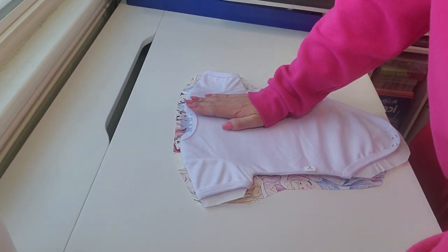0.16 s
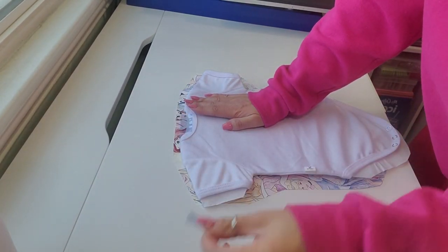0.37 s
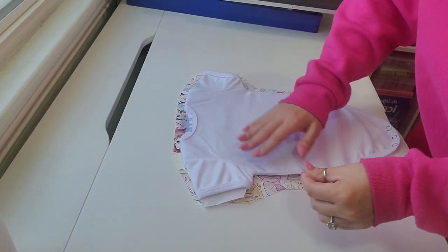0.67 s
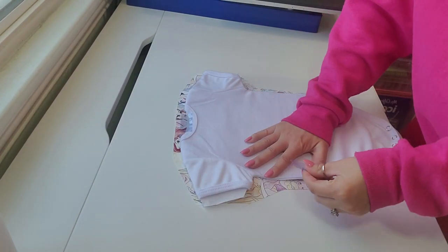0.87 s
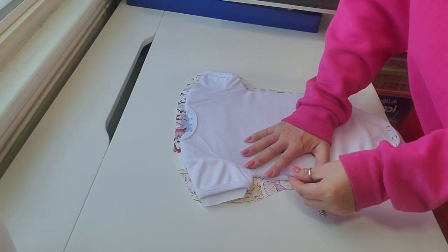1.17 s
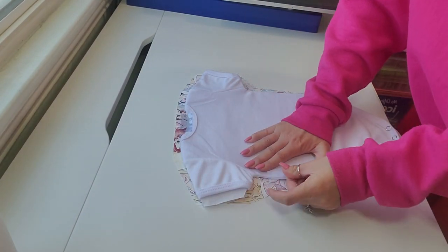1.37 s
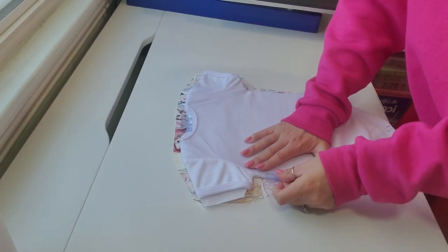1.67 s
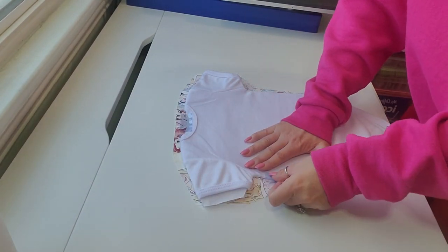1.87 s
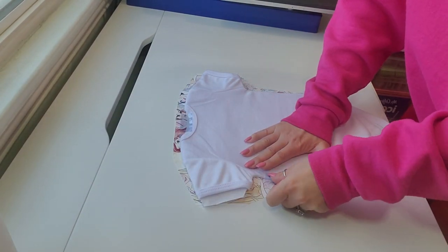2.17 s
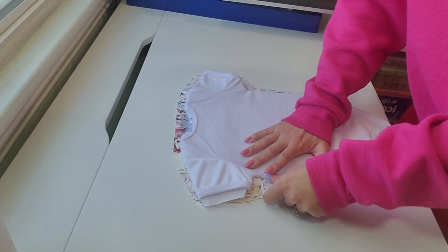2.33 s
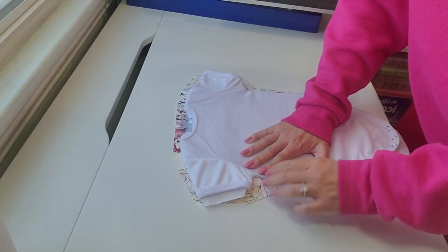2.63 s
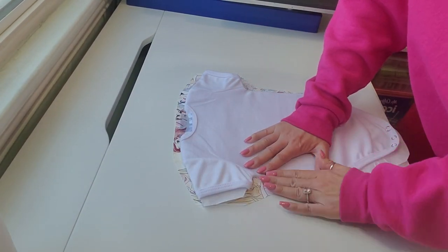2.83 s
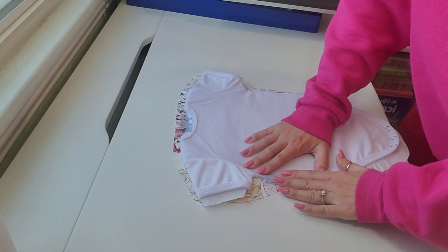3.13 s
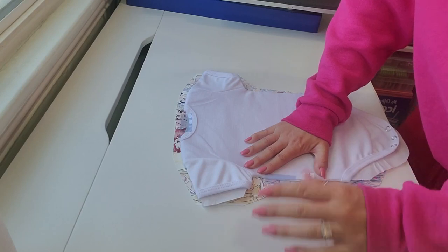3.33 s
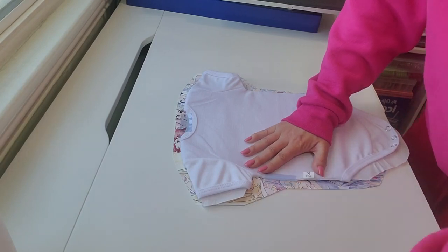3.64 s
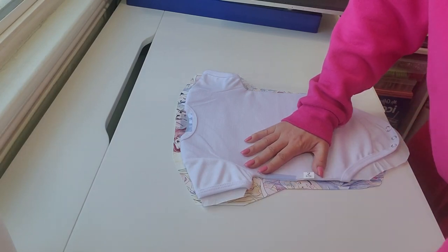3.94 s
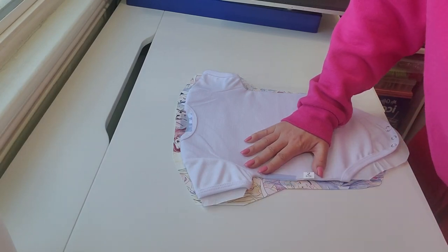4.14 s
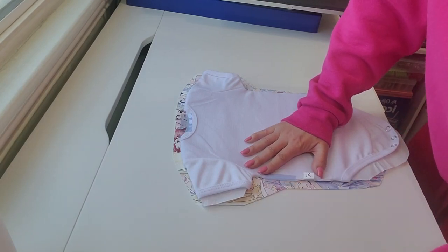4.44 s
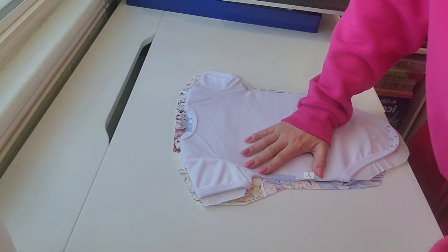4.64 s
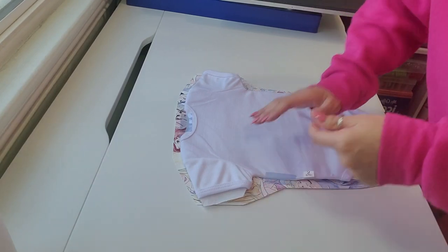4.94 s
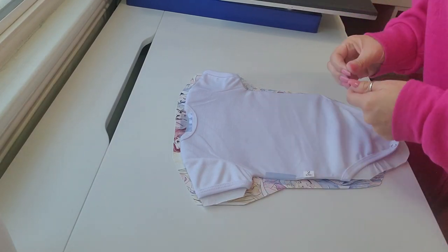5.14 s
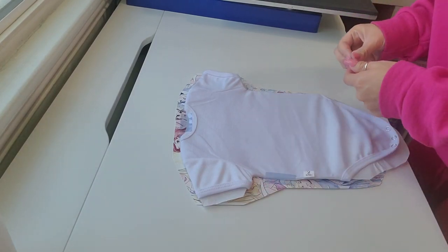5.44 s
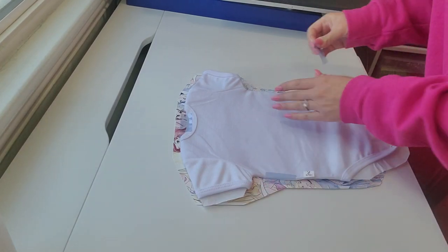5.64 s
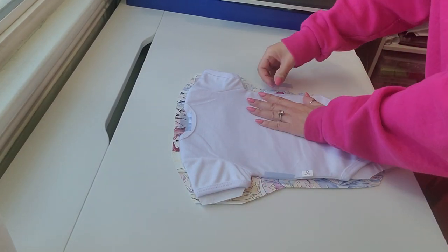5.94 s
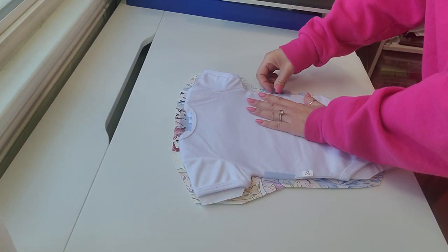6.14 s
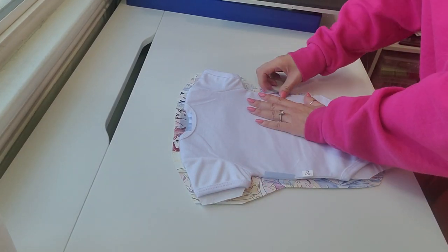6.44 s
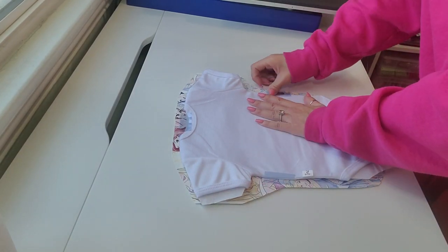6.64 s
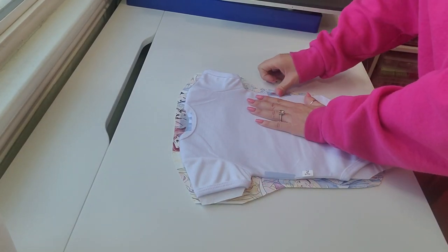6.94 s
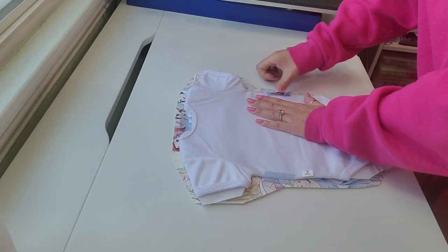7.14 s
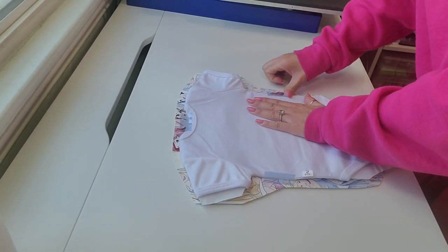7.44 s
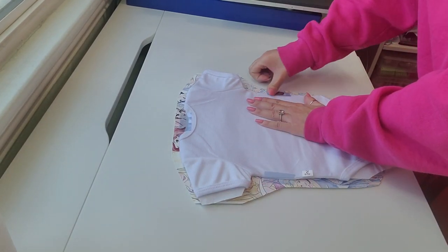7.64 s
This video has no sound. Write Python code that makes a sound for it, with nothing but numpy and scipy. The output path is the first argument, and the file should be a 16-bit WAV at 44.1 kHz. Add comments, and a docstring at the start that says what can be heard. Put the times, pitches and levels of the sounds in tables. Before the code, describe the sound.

Paper and tape crackle and click as hands smooth cloth on a table, with soft thuds and a low ventilation hum.

```python
"""Taping a small garment onto paper

Close to a phone, fingers rub and press cloth, and hands land on the table with soft thuds.
Paper and tape click and crackle in short rips, each with a hollow ring. Tape rasps off its roll
and is torn on the blade. A ventilation hum and a thin whine fill the quiet room."""
import sys
import numpy as np
from scipy import signal
from scipy.fft import rfft, irfft, next_fast_len
from scipy.io import wavfile
from scipy.ndimage import uniform_filter1d

SR = 44100
rng = np.random.default_rng(int(sys.argv[2]) if len(sys.argv) > 2 else 0)


def master(y):
    """Save y as 16-bit WAV."""
    cut = np.clip(np.atleast_2d(y).T, -1, 1)
    pcm = np.round(cut * 32767)  # scale
    wavfile.write(sys.argv[1], SR, pcm.astype(np.int16))


N = 344024


def gain(db):
    """Turn decibels into a number to multiply by."""
    return 10 ** (np.asarray(db) / 20)


def unit(x):
    """Scale a signal to an average power of 1."""
    return x / np.sqrt(np.mean(x ** 2))


def curve(table, hz):
    """Read between the rows of a (frequency, value) table, evenly in pitch."""
    freqs, values = np.transpose(table)
    return np.interp(np.log(hz + 1), np.log(freqs), values)


def wobble(span, size=N):
    """A random wander, smoothed over `span` samples."""
    return unit(uniform_filter1d(rng.standard_normal(size), span))


def mic_noise(size, alike=0.13, lag=11):
    """Noise at two microphones: the right hears a little of the left, `lag` samples later."""
    left, scatter = rng.standard_normal((2, size))
    return np.array([left, alike * np.roll(left, lag) + np.sqrt(1 - alike ** 2) * scatter])


def colour(burst, low_db, high_db, pan_db):
    """Even out a burst's spectrum, then tilt bass and treble; the phone shades mostly the treble."""
    size = burst.shape[1]
    hz, spectrum = np.fft.rfftfreq(size, 1 / SR), rfft(burst)
    even = spectrum / np.sqrt(uniform_filter1d(np.abs(spectrum) ** 2, int(size * 1500 / SR)))
    mid_gain = np.sqrt(size / 2 / np.sum((hz > 3500) & (hz < 8000)))
    tilt = [(400, low_db - 12.5), (1000, low_db - 7), (2400, low_db), (5500, 0), (11500, high_db - 3)]
    shade = curve([(1000, 0.05), (4000, .4), (11000, 1.1)], hz) * np.array([[pan_db], [-pan_db]]) / 2
    return mid_gain * irfft(even * gain(curve(tilt, hz) + shade), size)


def add(out, start, burst):
    """Mix a burst in at `start` seconds."""
    i = int(start * SR)
    part = burst[:, :N - i]
    out[:, i:i + part.shape[1]] += part


def ring(notes, size):
    """A struck object's notes, each fading by 60 dB over its ring time."""
    t = np.arange(size) / SR
    return sum(gain(db - 60 * t / ring_s) * np.sin(2 * np.pi * hz * t) for hz, db, ring_s in notes)


def stroke(start, rise, hold, rise_db, fall_db_per_s):
    """The samples one movement covers, and its loudness as it climbs, holds and fades."""
    end = start + rise + hold + 60 / fall_db_per_s
    span = slice(int(start * SR), min(int(end * SR), N))
    t = np.arange(N)[span] / SR - start
    db = -rise_db * np.clip(1 - t / rise, 0, 1) - fall_db_per_s * np.maximum(t - rise - hold, 0)
    return span, np.minimum(4 * t / rise, 1) * gain(db)


# how alike left and right are: (frequency [Hz], likeness [1 same, -1 opposite])
LIKENESS = [(60, 1), (290, .7), (640, 0.61), (1400, -0.05), (3000, -0.79)]
def room_noise(size, shape):
    """Noise from all around with the spectrum shape(hz), most alike on both sides in the bass."""
    padded = next_fast_len(size)
    hz = np.fft.rfftfreq(padded, 1 / SR)
    alike = curve(LIKENESS, hz)
    mid, side = rfft(rng.standard_normal((2, padded))) * shape(hz) * np.sqrt([1 + alike, 1 - alike])
    return unit(irfft([mid + side, mid - side], padded)[:, :size])


# rumble and hiss: (frequency [Hz], relative level [dB])
AIR_SPECTRUM = [(20, -24.5), (45, -9), (100, -8), (200, -7), (330, -13), (420, -14.5), (700, -20),
                (900, -27), (2000, -32.5), (5000, -32), (16000, -33.5)]
# narrow bands of humming noise: (pitch [Hz], width [Hz], level [dB])
HUM_BANDS = [(60.4, 23, -61.5), (123.8, 10, -60), (259.6, 14, -67.5), (376, 2.8, -74.5), (480.7, 17, -77),
             (3495, 27, -80)]
# motor and whine tones: (pitch [Hz], level [dB])
MOTOR_TONES = [(59.5, -63), (601, -76.5), (3440, -84)]
def ventilation(air_db=-60):
    """Moving air rumbles and hums, motor tones sway slowly, and the microphone hisses."""
    out = gain(air_db) * room_noise(N, lambda f: gain(curve(AIR_SPECTRUM, f)))
    for hz, width, db in HUM_BANDS:
        out += gain(db) * room_noise(N, lambda f: 1 / (1 + (2 * (f - hz) / width) ** 2))
    for hz, db in MOTOR_TONES:
        sway_db = 1.5 * unit(uniform_filter1d(wobble(15000), 15000))
        pitch = hz * (1 + 0.00045 * wobble(8000))
        phase = 2 * np.pi * np.cumsum(pitch) / SR + np.array([[0], [hz * 0.0013]])
        out += gain(db + sway_db) * np.sqrt(2) * np.sin(phase)
    return out


# skin, sleeve and tape sliding: (start [s], rise [s], hold [s], level [dB], dull layer offset [dB])
RUBS = [(0, 0.0013, 0.09, -44.5, -9), (0.646, 0.011, 0.013, -63, -17.5), (0.841, 0.033, 0.071, -57, -11.5),
        (1.3, 0.033, 0.057, -65, -34), (1.775, 0.039, 0.09, -65.5, -30.5), (2.24, 0.0034, 0.023, -48, -40),
        (2.505, 0.11, 0.041, -43.5, -28), (2.796, .025, 0.04, -65.5, -16), (2.968, 0.093, 0.034, -56, -16),
        (3.139, 0.04, 0.084, -78.5, 13), (3.298, 0.042, 0.0088, -66, -14), (3.57, .05, 0.15, -71, -17),
        (3.87, 0.012, 0.15, -62.5, -13), (4.28, .02, 0.047, -68.5, 2), (5.158, .015, .015, -65, -11.5),
        (5.469, .015, .008, -59, -20), (5.556, 0.081, .012, -58, -8), (5.73, 0.018, 0.058, -68.5, -4),
        (5.907, .015, 0.15, -57, -9.5), (6.426, .09, 0.057, -52.5, -8.5), (6.687, 0.07, 0.072, -58.5, -22),
        (6.944, 0.12, 0.059, -52.5, -21.5), (7.193, 0.02, 0.012, -60, -14), (7.27, 0.06, .035, -58, -8.5),
        (7.402, 0.13, 0.06, -53, -22), (7.633, 0.016, .008, -62.5, -9), (7.744, 0.023, 0.021, -67.5, -33)]
# the bright hiss of rubbing: (frequency [Hz], relative level [dB])
RUB_SPECTRUM = [(1900, -17), (3300, -1.5), (5000, -4), (9300, -4.5), (12000, -4), (16500, -5)]
def rubs(pan_db=0.5, pressure_db=1.13):
    """Friction makes a bright hiss over a duller one; both waver with uneven pressure."""
    padded = next_fast_len(N)
    hz = np.fft.rfftfreq(padded, 1 / SR)
    noise = rfft(mic_noise(N, alike=0.1), padded)
    bright = unit(irfft(noise * gain(curve(RUB_SPECTRUM, hz)))[:, :N])
    dull_band = (hz / 900) ** 2 / (1 + (hz / 900) ** 2) / (1 + (hz / 3400) ** 6)
    dull = unit(irfft(noise * dull_band)[:, :N])
    out = np.zeros((2, N))
    for start, rise, hold, db, dull_db in RUBS:
        span, swell = stroke(start, rise, hold, rise_db=13, fall_db_per_s=420)
        out[:, span] += gain(db) * swell * (bright[:, span] + gain(dull_db) * dull[:, span])
    return out * gain(pressure_db * wobble(1500) + np.array([[pan_db], [-pan_db]]) / 2)


# hands and dispenser landing on the table: (time [s], knock level [dB], boom level [dB])
THUDS = [(0.037, -46.5, -60), (0.093, -53.5, -62.5), (.235, -42, -39), (0.863, -50.5, -56),
         (1.874, -55.5, -59), (2.348, -36, -46.5), (2.596, -49.5, -49.5), (2.807, -50.5, -49),
         (2.863, -55, -61), (3.167, -43.5, -61), (3.244, -45.5, -54), (4.599, -48.5, -54),
         (4.63, -47.5, -42), (5.921, -55.5, -51), (6.561, -47, -54), (7.766, -66, -46)]
# notes of the table top: (pitch [Hz], relative level [dB], ring time [s])
TABLE_NOTES = [(135.7, -13.5, 1), (194.9, 2.5, 0.19), (221.1, 0.5, 0.19), (237, -13, 0.2), (334, -6, 0.15),
               (390, -6.5, 0.12), (429.6, -10, 0.18), (536, -11.5, 0.18)]
# deepest notes of the room: (pitch [Hz], relative level [dB], ring time [s])
BOOM_NOTES = [(60.77, 4.5, 0.78), (63.9, -3, 0.63), (88.35, -5, 0.47)]
def thuds(contact_ms=2.5, settle_ms=7.3, swell_ms=21.0):
    """A soft push rings the table top; the room's deepest notes swell up after it."""
    out, ms = np.zeros((2, N)), np.arange(30000) * 1000 / SR
    push = np.hanning(int(contact_ms * SR / 1000))
    settle = 1 - np.exp(-ms[:12000] / settle_ms)  # the palm takes a moment to land
    boom = (1 - np.exp(-(ms / swell_ms) ** 2)) * ring(BOOM_NOTES, len(ms))
    for start, knock_db, boom_db in THUDS:
        notes = [(hz, db + rng.normal(0, 2), ring_s) for hz, db, ring_s in TABLE_NOTES]
        knock = signal.fftconvolve(settle * ring(notes, len(settle)), 2 * push / push.sum())
        add(out, start, gain(knock_db) * knock[None])
        add(out, start, gain(boom_db) * boom[None])
    return out


# paper and tape snapping: (time [s], level [dB], bass tilt [dB], treble tilt [dB])
CLICKS = [(0.0393, -25, -4, 6), (0.0435, -31, -8.5, 0.5), (0.095, -28, -2.5, 5), (0.2143, -32, -8.5, 8.5),
          (0.2158, -34.5, -5, 11), (0.2353, -29, -1.5, 8.5), (0.8685, -50, 0.5, -22),
          (0.8957, -53.5, 7.5, -17), (1.3915, -41.5, -4, 6), (2.245, -43.5, -29, 6), (2.323, -51, -6, -12),
          (2.3537, -26, -17, 1.5), (2.3838, -34.5, 0, 2), (2.5154, -36.5, -5.5, 5.5),
          (2.5734, -41.5, -5.5, 1), (2.583, -56.5, 11, 23), (2.598, -33.5, -19, -13),
          (2.6083, -35.5, -4.5, 8), (3.0182, -65, 1, -22), (3.6182, -58.5, 0, -23), (3.8789, -41.5, -1, 0),
          (4.055, -46.5, 8, 0), (4.1039, -38.5, -1, 4), (4.4106, -56.5, 0.5, -10), (4.442, -31.5, -7, 1.5),
          (4.4466, -26, -12.5, -2.5), (4.4669, -36.5, -1, 3.5), (4.5153, -57, -6.5, -3.5),
          (4.522, -50, -11.5, 6.5), (4.5318, -41.5, -16.5, 3), (4.5809, -34, -14, 5.5),
          (4.5897, -33, -15, 14), (4.618, -26.5, 3.5, 7), (5.2797, -50, 1, 9.5), (5.4771, -63, -4, 0),
          (5.4954, -56, -1.5, -8), (5.61, -44.5, 2, 6.5), (5.93, -49.5, -2, -5.5), (6.0038, -55.5, 5, -23),
          (6.0288, -51.5, -2, -35), (6.428, -61, 8, -16), (6.464, -52, 1, -11), (6.4917, -37, -1, -0.5),
          (6.5004, -41.5, 3, -8), (6.555, -41, -1, 2.5), (7.327, -59.5, 11, -17), (7.6023, -50.5, 0.5, -23)]
def clicks(snap_ms=.7, shiver_ms=6.0, shiver_db=-21, quick_rub_s=.03):
    """A crease lets go in a millisecond and the sheet shivers on. Quick rubs catch with a tick."""
    out, ms = np.zeros((2, N)), np.maximum(np.arange(-100, 1100) * 1000 / SR, 0)
    fade = np.exp(-ms / snap_ms) + gain(shiver_db) * np.exp(-ms / shiver_ms)
    shape = (1 - np.exp(-ms / 0.67)) * fade
    ticks = [(start + rise + 0.0033, db + rng.normal(-2, 4), rng.normal(-5, 4), rng.normal(-3, 6))
             for start, rise, _, db, _ in RUBS if rise < quick_rub_s]
    for start, db, low_db, high_db in CLICKS + ticks:
        pan_db = 1.5 + 0.73 * high_db  # brighter snaps lie further left
        snap = colour(mic_noise(len(ms)) * shape, low_db, high_db, pan_db)
        add(out, start - 100 / SR, gain(db) * np.sqrt(SR / 200) * snap)
    return out


# when snaps ring the dispenser's blade: (start [s], end [s])
PING_TIMES = [(0, .3), (3.8, 4.7)]
# notes of the blade: (pitch [Hz], relative level [dB], ring time [s])
BLADE_NOTES = [(3450, -9, .008), (5530, -2, 0.0047), (6480, -4.5, .008), (1100, -5.5, .03),
               (450, -9.5, 0.048)]
def blade_pings(snaps):
    """While the dispenser is in use, each snap makes its blade ping."""
    t = np.arange(N) / SR
    in_use = sum((t >= start) & (t < end) for start, end in PING_TIMES)
    return signal.fftconvolve(snaps * in_use, ring(BLADE_NOTES, 3000)[None], axes=1)[:, :N]


# short crackling rips of tape and paper, the loudest being tape torn on the blade:
# (start [s], end [s], level [dB], bass tilt [dB], treble tilt [dB], lean to left [dB])
RIPS = [(0.218, 0.239, -25, 1.5, 5.5, -2), (4.591, 4.599, -28, 2, -6, 14), (4.606, 4.627, -27.5, 2, 6, -1),
        (5.603, 5.628, -50, -8, 2, -3), (2.245, 2.257, -48, -27, -3.5, -3),
        (3.872, 3.892, -47, -2.5, -3, 6), (1.393, 1.41, -53.5, -5.5, 2.5, -8),
        (6.556, 6.567, -44, -14, 5, 0.5), (2.355, 2.365, -35, -6, 2, 5), (6.493, 6.51, -37, -23, -7.5, 2)]
def rips(crackle_db=3):
    """Tape and paper crackle in short rips: noise in uneven grains a millisecond long."""
    out, sample = np.zeros((2, N)), np.arange(-100, 2300)
    for start, end, db, low_db, high_db, pan_db in RIPS:
        size = (end - start) * SR
        grains = gain(crackle_db * np.repeat(rng.standard_normal(len(sample)), 44))[:len(sample)]
        gate = (sample > 0) * np.clip((size - sample) / 200 + 1, 0, 1)
        crackle = colour(mic_noise(len(sample)) * grains * gate, low_db, high_db, pan_db)
        add(out, start - 100 / SR, gain(db) * np.sqrt(size) * crackle)
    return out


# notes of a hollow body: (pitch [Hz], relative level [dB], ring time [s])
HOLLOW_NOTES = [(480, -8, .05), (900, 1, .06), (990, 2, .06), (1150, -2, .05), (1840, -4, .04),
                (2750, -5, .03)]
def hollow_ring(ripping):
    """Each rip adds a brief hollow ring."""
    return signal.fftconvolve(ripping, ring(HOLLOW_NOTES, 8000)[None], axes=1)[:, :N]


# short sliding hisses: (start [s], loudest moment [s], level [dB])
SWIPES = [(1.333, 1.402, -55.5), (2.921, 3.018, -53.5), (3.535, 3.627, -67.5), (6.319, 6.401, -56)]
def swipes(from_hz=4900, to_hz=3380, width_hz=700, stutter_db=3.0):
    """A slide catches and slips: a narrow hiss that sinks in pitch as it swells."""
    out, t = np.zeros((2, N)), np.arange(N) / SR
    lowpass = signal.butter(2, width_hz / 2, fs=SR, output="sos")
    slow = signal.sosfilt(lowpass, rng.standard_normal((2, 2, N)))
    stutter = gain(stutter_db * wobble(300))
    for start, peak, db in SWIPES:
        progress = np.clip((t - start) / (peak - start), 0, 9)
        pitch = to_hz + (from_hz - to_hz) * np.exp(-1.7 * progress)
        tone = np.exp(2j * np.pi * np.cumsum(pitch) / SR)
        hiss = unit(((slow[0] + 1j * slow[1]) * tone).real)  # lifts the slow noise up to the pitch
        span, swell = stroke(start, peak - start, hold=0.0088, rise_db=12.5, fall_db_per_s=185)
        out[:, span] += gain(db) * swell * (stutter * hiss)[:, span]
    return out


# the rasp of peeling glue: (frequency [Hz], relative level [dB])
GLUE_SPECTRUM = [(290, -38), (500, -7), (604, -5), (1260, -10.5), (1980, -11.5), (2260, -8.5), (3390, -5),
                 (7860, -7.5), (11300, -1.5), (16000, -4.5)]
def tape_pull(level_db=-41, rasp_db=4.0, judder_db=2.0):
    """Tape is drawn off the roll: its glue lets go in tiny uneven grains, in fits."""
    span, swell = stroke(start=4.052, rise=.06, hold=.15, rise_db=13, fall_db_per_s=450)
    size = len(swell)
    grains = gain(rasp_db * np.repeat(rng.standard_normal(size), 30)[:size])
    crackle = mic_noise(size) * grains * gain(judder_db * wobble(700, size))
    hz = np.fft.rfftfreq(size, 1 / SR)
    rasp = unit(irfft(rfft(crackle) * gain(curve(GLUE_SPECTRUM, hz)), size))
    out = np.zeros((2, N))
    out[:, span] = gain(level_db + np.array([[1.5], [-1.5]])) * rasp * swell  # louder on the left
    return out


# the room's echo, band by band: (frequency [Hz], ring time [s], level [dB])
ECHO_BANDS = [(125, 0.44, 0), (510.2, 0.75, -2), (1220, 0.35, 1.5), (3000, 0.37, -1.5), (7100, 0.34, -5.5),
              (13300, 0.31, -6.5)]
def room_echo(sound, gap_ms=4.0):
    """Reflections blur into a short tail; each band fades at its own speed."""
    t, tail = np.arange(24000) / SR, 0
    for hz, ring_s, db in ECHO_BANDS:
        weights = [(f, float(f == hz)) for f, _, _ in ECHO_BANDS]
        band = room_noise(len(t), lambda f: np.sqrt(curve(weights, f)))
        width = np.mean(curve(weights, np.linspace(0, SR / 2, 2000)))
        fade = gain(-60 * t / ring_s) * np.clip(t * 1000 / gap_ms - .5, 0, 1)
        tail = tail + gain(db) * np.sqrt(width / np.sum(fade ** 2)) * band * fade
    return signal.fftconvolve(sound, tail, axes=1)[:, :N]


def scene():
    """Mix the steady air, the sounds at the table and their echo."""
    air, rubbing, knocks, snaps = ventilation(), rubs(), thuds(), clicks()
    snaps = snaps + gain(-24) * blade_pings(snaps)
    ripping = rips()
    ripping = ripping + gain(-38.5) * hollow_ring(ripping)
    slides = rubbing + swipes() + tape_pull()
    echo = room_echo(gain(-12.5) * knocks + gain(-3) * snaps + ripping + gain(-4) * slides)
    return air + knocks + snaps + ripping + slides + echo


def record(dry, low_hz=45, top_hz=15900):
    """The phone cuts the deepest bass and the highest treble."""
    dry = signal.sosfilt(signal.butter(3, low_hz, "high", fs=SR, output="sos"), dry)
    return signal.sosfilt(signal.ellip(12, .2, 90, top_hz, fs=SR, output="sos"), dry)


dry = scene()
out = record(dry)
master(out)
```